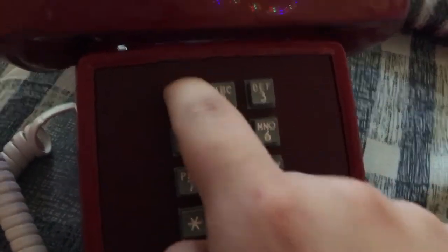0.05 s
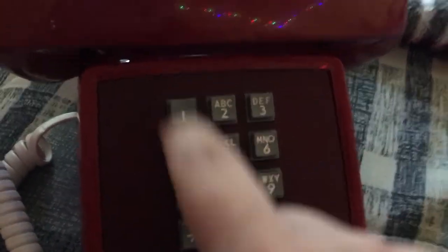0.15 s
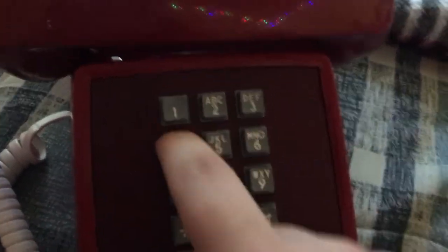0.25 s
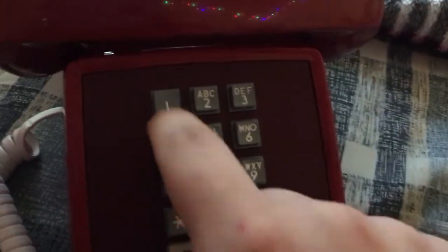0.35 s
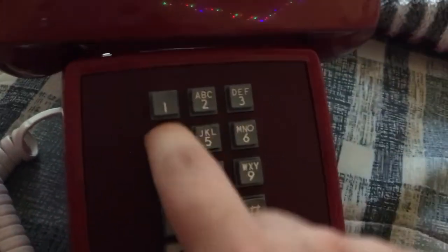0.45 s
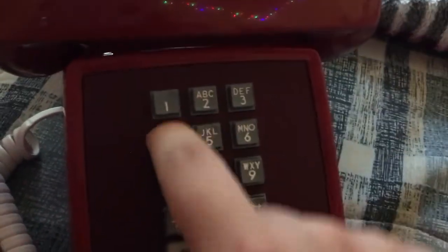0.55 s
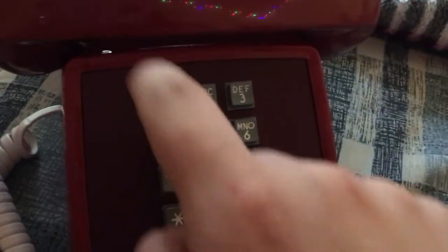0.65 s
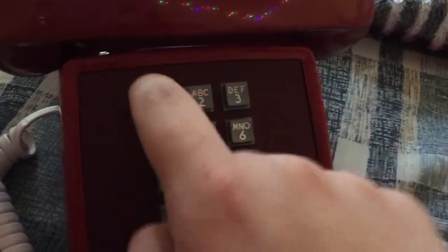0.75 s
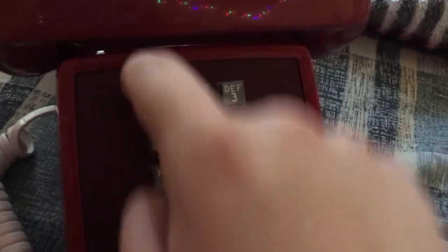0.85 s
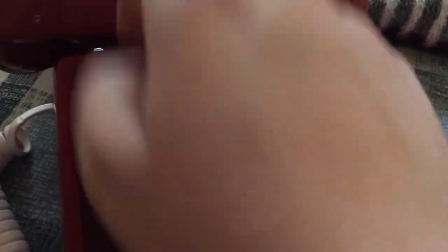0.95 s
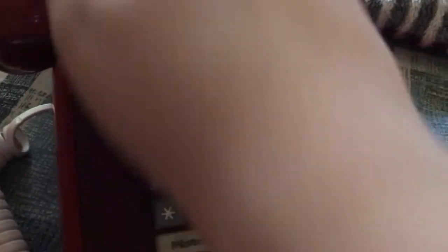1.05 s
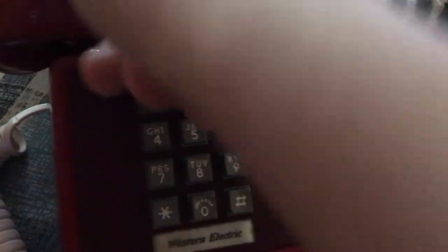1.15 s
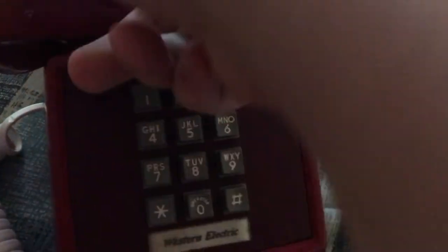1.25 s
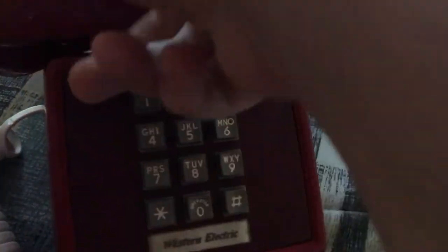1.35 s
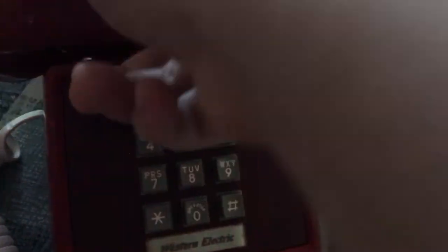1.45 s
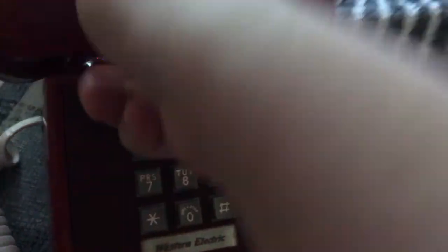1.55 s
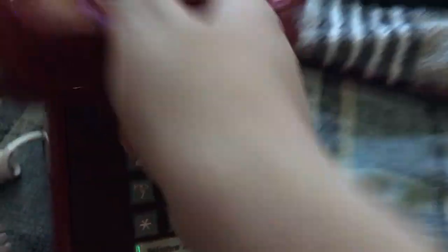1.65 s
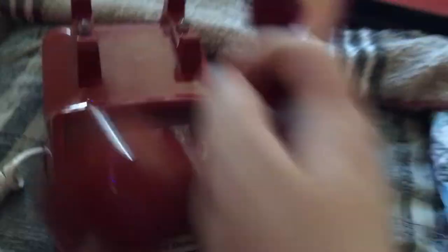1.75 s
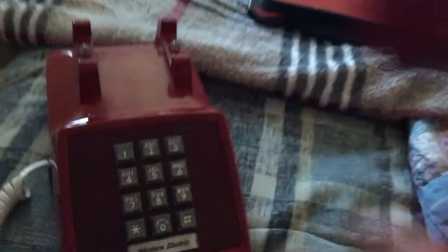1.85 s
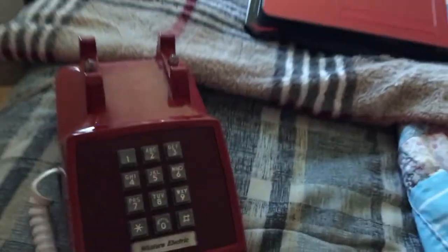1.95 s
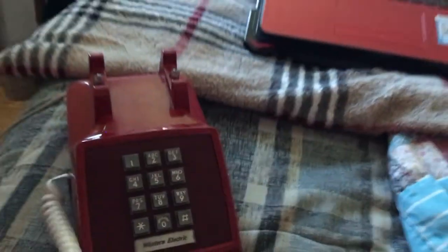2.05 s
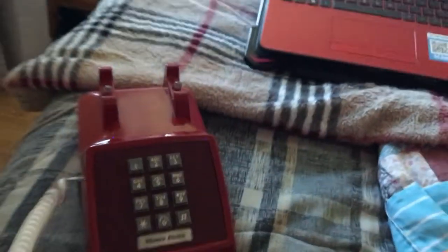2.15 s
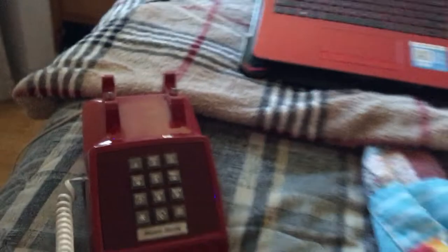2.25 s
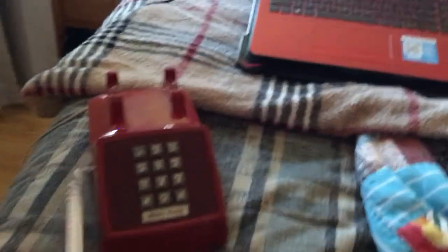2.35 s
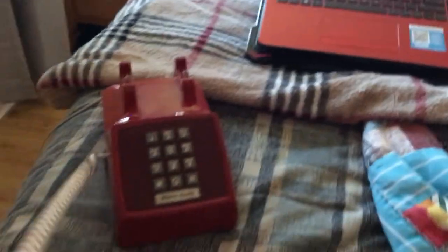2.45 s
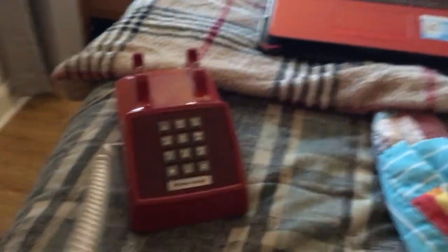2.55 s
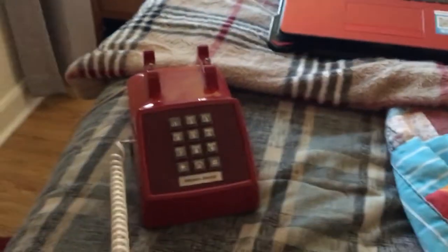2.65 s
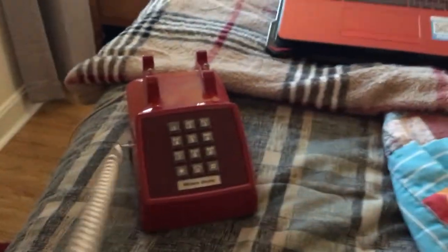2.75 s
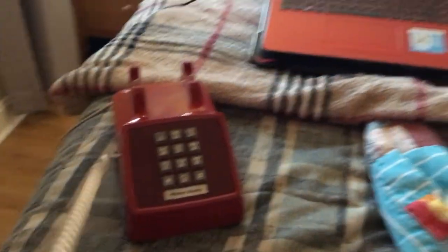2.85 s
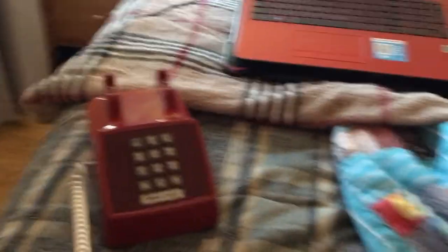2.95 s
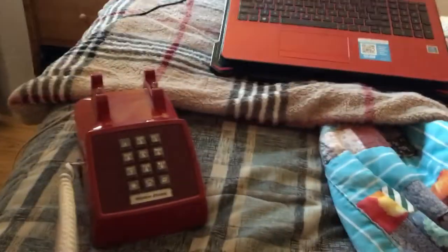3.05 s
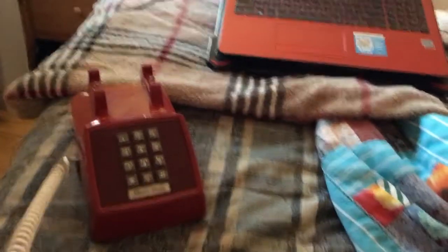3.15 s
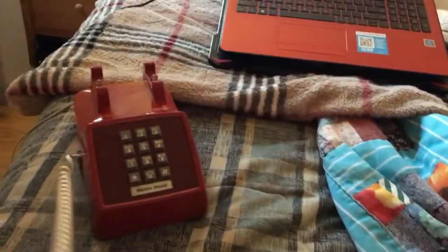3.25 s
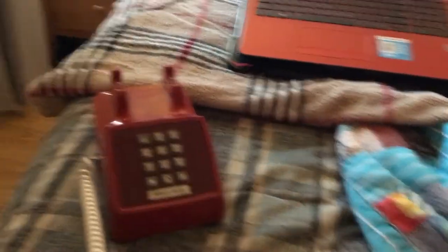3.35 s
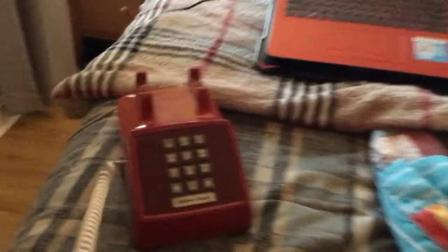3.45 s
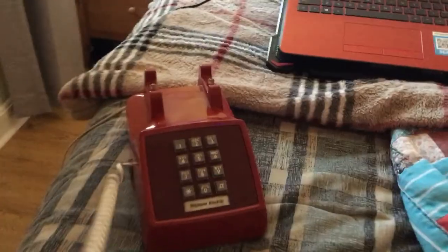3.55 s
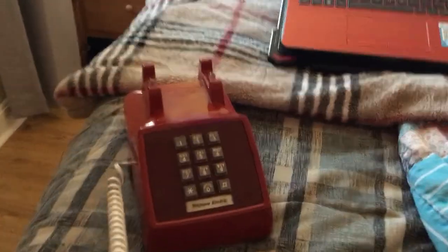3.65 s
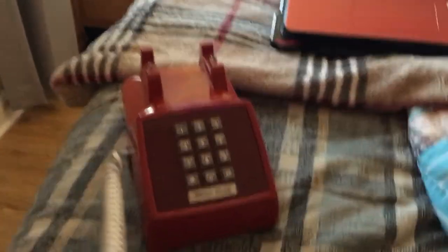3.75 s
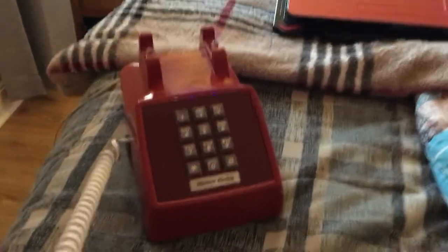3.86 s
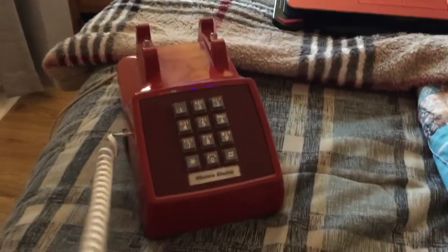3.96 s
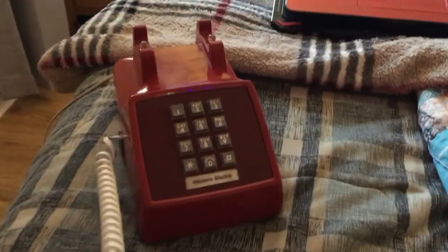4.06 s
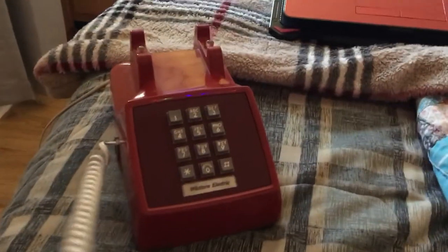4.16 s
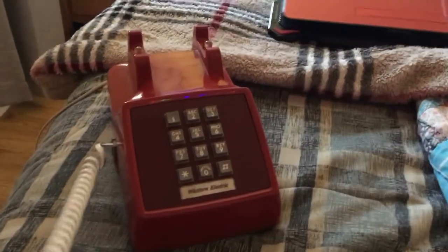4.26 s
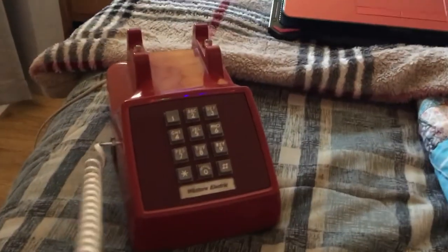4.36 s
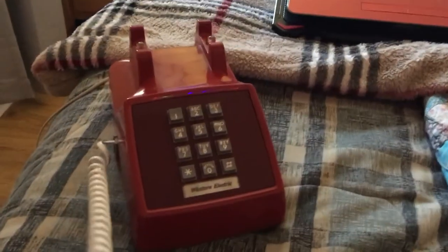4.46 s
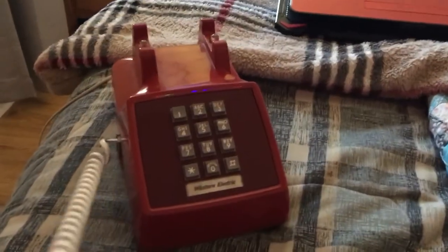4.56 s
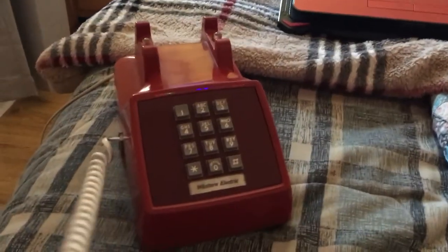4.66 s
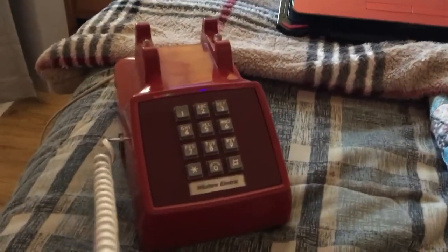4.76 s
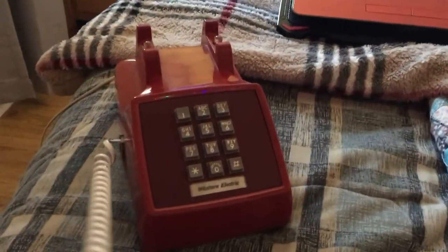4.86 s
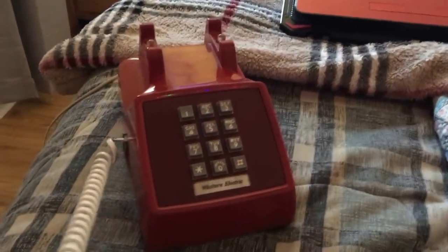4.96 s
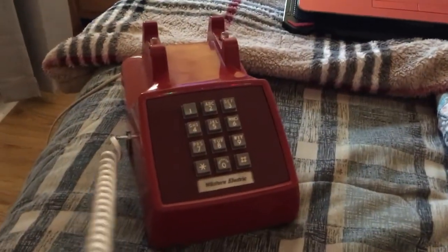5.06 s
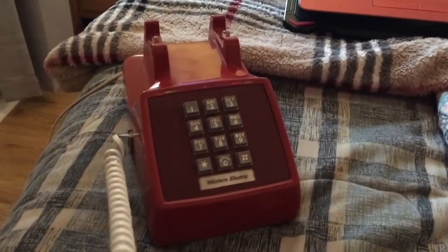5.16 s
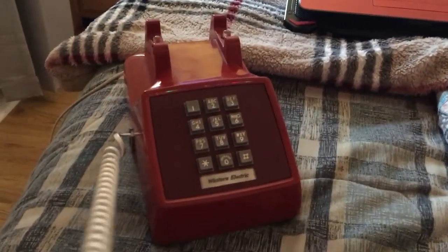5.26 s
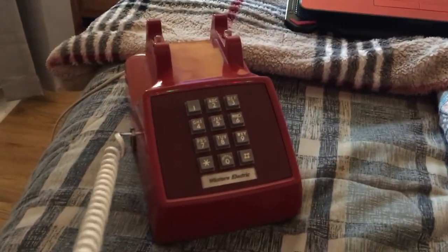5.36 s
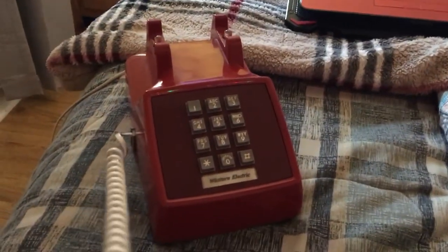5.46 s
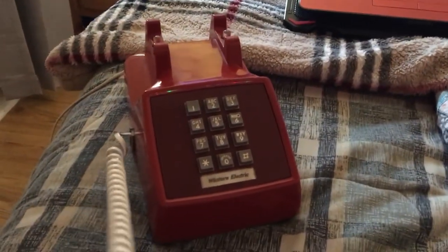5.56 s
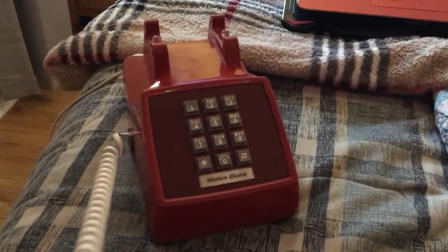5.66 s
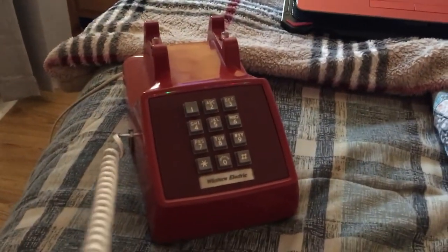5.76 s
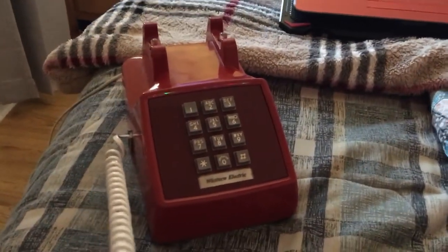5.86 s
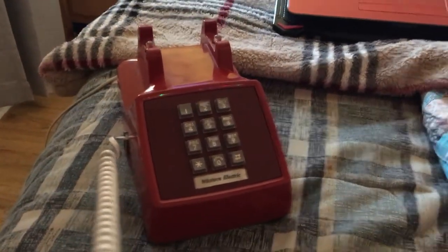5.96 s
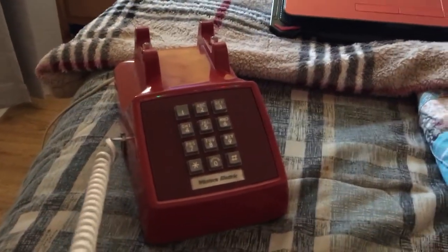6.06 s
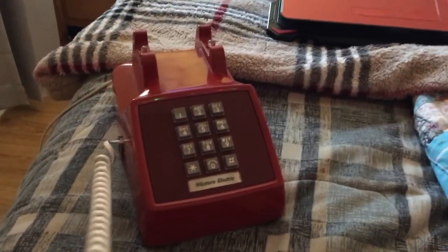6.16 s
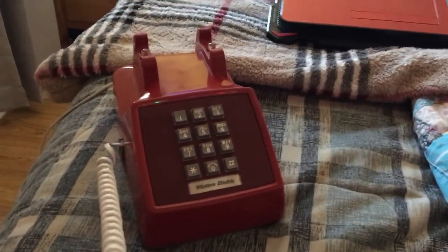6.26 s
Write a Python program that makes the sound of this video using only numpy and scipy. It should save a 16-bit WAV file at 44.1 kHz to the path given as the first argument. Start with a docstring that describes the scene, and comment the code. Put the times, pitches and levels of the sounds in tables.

```python
"""A push-button desk telephone on a bed, close by: four keys click down, three of them snap back up on their springs.
A hand works the handset off its cradle, and the hook switch springs up with a ringing clack.
Contacts are bursts of band-limited noise plus decaying sine modes; rubs are swelling noise.
A small bedroom adds a short tail to the contacts. Sines hum; a fan whirs faintly and drops back after four seconds."""
import sys
import numpy as np
from scipy import signal
from scipy.fft import rfft, irfft, next_fast_len
from scipy.io import wavfile
from scipy.ndimage import map_coordinates

SR = 44100
rng = np.random.default_rng(int(sys.argv[2]) if len(sys.argv) > 2 else 0)


def output_pcm(signal):
    """Save a mono or channel-first signal as 16-bit PCM at the path in sys.argv[1].

    Samples are clipped to [-1, 1] before scaling.
    """
    pcm = np.clip(np.atleast_2d(signal).T, -1, 1) * 32767
    wavfile.write(sys.argv[1], SR, np.round(pcm).astype(np.int16))


N = 278712
TIME = np.arange(N) / SR
AGE = np.arange(SR // 2) / SR  # time since a contact [s]

# ringing modes of the keypad: (frequency [Hz], relative level [dB], t60 [s])
KEYPAD_MODES = [(432, -8, 0.13), (493, -6, 0.097), (606.7, 2.5, 0.13), (770, -17.5, 0.017),
                (893, 1.5, 0.084), (1183, 4, 0.097), (1550, -10.5, .035), (1660, 15, 0.037),
                (2924, -1, 0.032)]
# spectrum of handset plastic on its cradle: (frequency [Hz], relative level per Hz [dB])
HANDSET_COLOUR = [(70, -21), (150, 0.5), (250, -2.5), (480, 2), (750, -1), (1000, -5), (1250, -1),
                  (1700, -8), (2200, -7.5), (2700, -15.5), (3300, -13), (5000, -22.5), (8000, -15.5),
                  (10500, -32.5), (16000, -45)]


def amp(db):
    """Gain from dB."""
    return 10 ** (np.asarray(db) / 20)


def unit(x):
    """Scale to rms 1."""
    return x / np.sqrt(np.mean(x ** 2) + 1e-20)


def unit_attack(x):
    """Scale to rms 1 over the first 10 ms."""
    return x / np.sqrt(np.mean(x[:SR // 100] ** 2) + 1e-20)


def along(points, hz):
    """Interpolate (frequency, value) points on a log frequency axis."""
    point_hz, value = np.transpose(points)
    return np.interp(np.log(hz + 1), np.log(point_hz + 1), value)


def wobble(rate_hz):
    """Smooth random curve with rate_hz knots a second."""
    knots = rng.standard_normal(int(N * rate_hz / SR) + 4)
    return map_coordinates(knots, [TIME * rate_hz])


def wavering_sine(hz, depth, rate_hz):
    """Sine whose frequency wanders by the relative depth."""
    return np.sin(2 * np.pi * np.cumsum(hz * (1 + depth * wobble(rate_hz))) / SR)


def noise(colour, size, band_hz=(0, SR)):
    """Noise of rms 1 with the given spectrum inside a band."""
    fft_size = next_fast_len(size)
    hz = np.fft.rfftfreq(fft_size, 1 / SR)
    gain = amp(along(colour, hz)) * (hz >= band_hz[0]) * (hz < band_hz[1])
    white = rng.standard_normal(fft_size)
    return unit(irfft(rfft(white) * gain, fft_size)[:size])


def add(track, start_s, sound):
    """Mix a sound into the track."""
    part = track[round(start_s * SR):][:len(sound)]
    part += sound[:len(part)]


def swell(rise_s, t60_s):
    """Contact envelope: builds over the rise time, then decays exponentially."""
    decay = amp(-60 * np.maximum(AGE - rise_s, 0) / t60_s)
    return (1 - np.exp(-(AGE / rise_s) ** 2)) * decay


def stroke(peak_s, db, fade_s):
    """Gain of a rub that speeds up to its peak and slows again; fade_s is the e-folding time."""
    return amp(db) * np.exp(-np.abs(TIME - peak_s) / fade_s)


def step(middle_s, length_s):
    """Smooth change from 0 to 1."""
    return (1 + np.tanh((TIME - middle_s) / length_s)) / 2


def band_levels(shares_db, db, bright_db=0):
    """Level of each band of a contact; bright_db per band tilts them towards the treble."""
    return db + np.array(shares_db) + bright_db * (np.arange(len(shares_db)) - 1)


def contact(rise_s, levels_db, colour, t60s_s):
    """Dense, fast-dying modes of hard plastic as banded noise; low bands build more slowly."""
    # noise bands, low to high: (bottom [Hz], top [Hz])
    bands_hz = [(60, 350), (350, 1400), (1400, 6500), (6500, 17000)]
    out = np.zeros(len(AGE))
    # fewer levels than bands: the lowest bands stay silent
    for db, band_hz, t60_s in zip(levels_db, bands_hz[-len(levels_db):], t60s_s):
        burst = noise(colour, len(AGE), band_hz) * swell(rise_s + 1 / band_hz[1], t60_s)
        out += amp(db) * unit_attack(burst)
    return out


def ring(modes):
    """Long-lived modes of a body as decaying sines, at new strengths and phases for every blow."""
    hz, db, t60_s = np.transpose(modes)[:, :, None]
    strength = amp(db + rng.standard_normal(hz.shape))  # 1 dB scatter
    phase = 2 * np.pi * (hz * AGE + rng.random(hz.shape))
    waves = strength * amp(-60 * AGE / t60_s) * np.sin(phase)
    attack = 1 - np.exp(-AGE / 0.0039)
    return waves.sum(0) / np.linalg.norm(strength) * 2 * attack


def in_room(x, wet_db):
    """A sound plus the bedroom's answer: a dull cluster of wall reflections inside a short tail."""
    # decay of the room: (frequency [Hz], t60 [s])
    room_t60 = [(150, 0.15), (800, 0.29), (3000, 0.28), (8000, 0.29), (16000, 0.29)]
    # spectrum of the answer, before wet_db: (frequency [Hz], level [dB])
    room_wet = [(150, -16), (500, -3), (1200, -6), (3000, -10), (8000, -16), (16000, -18)]
    delay_s, walls_s, walls_width_s = 0.008, 0.0092, 0.0042  # walls_s counts from the delayed start
    walls_gain, walls_cutoff_hz = 0.87, 2000
    hz, t, z = signal.stft(rng.standard_normal(len(AGE)), SR, nperseg=128)
    cluster = walls_gain * np.exp(-((t - walls_s) / walls_width_s) ** 2)
    cluster = cluster / (1 + (hz[:, None] / walls_cutoff_hz) ** 2)
    decay = amp(-60 * t / along(room_t60, hz)[:, None])
    decay = decay * (1 + 1.3 * np.exp(-t / 0.014) + cluster)
    tail = signal.istft(z * decay, SR, nperseg=128)[1][:len(AGE)]
    tail = tail * (1 - np.exp(-AGE / 0.00099))
    size = 2 * len(AGE)
    f = np.fft.rfftfreq(size, 1 / SR)
    answer = rfft(tail / np.linalg.norm(tail), size) * amp(wet_db + along(room_wet, f))
    answer = answer * np.exp(-2j * np.pi * f * delay_s)
    return irfft(rfft(x, size) * (1 + answer), size)


def motor_hum():
    """A motor hums: harmonics of one wandering rotation, each wavering in level, easing late on."""
    # hum partials: (multiple of the fundamental, mean rms level before the drop [dB])
    hum_partials = [(1, -54), (2, -71), (3, -68.5), (4, -87)]
    hum_hz, drop_s, drop_db, change_s = 86.1, 4.75, 4, 0.2
    turns = np.cumsum(hum_hz * (1 + 0.0026 * wobble(2.98))) / SR
    hum = np.zeros(N)
    for multiple, db in hum_partials:
        sine = np.sin(2 * np.pi * round(multiple) * turns)
        hum += amp(db + 1.1 * wobble(4)) * sine * np.sqrt(2)
    return amp(-drop_db * step(drop_s, change_s)) * hum


def fan():
    """Shaped noise for air, plus a whine and a fluttering whistle that stop as the air drops back."""
    # air noise: (frequency [Hz], relative level per Hz [dB])
    fan_air = [(150, -13.5), (380, 3), (720, -3), (1000, 1), (1500, -6.5), (2600, -12.5), (8000, -25.5),
               (16000, -27.5)]
    # narrow whir that swells before the drop: (frequency [Hz], relative level per Hz [dB])
    whir_colour = [(500, -27), (800, -6), (1000, 2), (1200, -13), (2000, -30), (16000, -60)]
    air_db, drop_s, drop_db, change_s = -69.5, 4.19, 6.5, 0.06
    tones_start_s, tones_db = 2.85, -75
    whine = wavering_sine(857, 0.006, 20)
    whistle = amp(-7.5 + 3.0 * wobble(14)) * wavering_sine(2660, 0.0177, 200)
    dropped = step(drop_s, change_s)
    air = amp(air_db - drop_db * dropped) * noise(fan_air, N)
    tones = amp(tones_db) * step(tones_start_s, change_s) * (1 - dropped) * (whine + whistle)
    whir = stroke(3.93, -71.5, fade_s=0.15) * noise(whir_colour, N)
    return air + tones + whir


def room_noise():
    """Steady rumble and thin hiss, both shaped noise."""
    # rumble: (frequency [Hz], relative level per Hz [dB])
    rumble_colour = [(18, -17), (28, -9), (36, -8.5), (45, 1), (60, 1.5), (78, -1.5), (100, -15),
                     (180, -12.5), (330, -22.5), (600, -27.5), (1500, -45.5), (16000, -65)]
    # hiss: (frequency [Hz], relative level per Hz [dB])
    hiss_colour = [(500, -22), (1500, -0.5), (2500, 2.5), (4000, 1), (4900, -4), (6400, 2.5), (7700, -3.5),
                   (9000, 0), (10500, -6), (11800, -1), (16000, -10.5)]
    return amp(-54.5) * noise(rumble_colour, N) + amp(-74.5) * noise(hiss_colour, N)


def key_click(rise_s, levels_db):
    """Plastic strikes plastic and the keypad rings."""
    # key contact: (frequency [Hz], relative level per Hz [dB])
    key_colour = [(250, -37), (440, -0.5), (850, -9), (1200, 1.5), (2400, -9), (3070, -6), (4300, -9.5),
                  (6100, -5), (7000, -2), (9400, 2.5), (10300, -8), (14100, -6.5), (16000, -18)]
    click = contact(rise_s, levels_db, key_colour, t60s_s=(0.036, 0.021, 0.017))
    return in_room(click + amp(levels_db[0] + 0.5) * ring(KEYPAD_MODES), wet_db=-3.5)


def key_presses():
    """Each key scuffs down its guide, touches its spring and hits bottom."""
    # keys hitting bottom, the third twice: (time [s], level [dB], brightness [dB per band])
    presses = [(0.0347, -35, 3), (0.2959, -34.5, 0.1), (0.568, -33, -1), (0.5815, -45, -7.5),
               (0.8867, -37.5, 1)]
    # share of each band, low to high: (level [dB], ...)
    press_bands = (-6, 0, -8.5)
    # scuff: (frequency [Hz], relative level per Hz [dB])
    push_colour = [(400, -4), (1200, 2.5), (3000, -5), (5000, -3.5), (9000, -6), (11000, -11),
                   (16000, -13.5)]
    scuff_lead_s, scuff_db, scuff_fade_s = 0.013, -18, 0.0069  # dB relative to the press
    touch_lead_s, touch_db, touch_bright_db = 0.0045, -15.5, 10.5
    out, scuff = np.zeros(N), np.zeros(N)
    for s, db, bright_db in presses:
        scuff += stroke(s - scuff_lead_s, db + scuff_db, scuff_fade_s)
        touch_levels = band_levels(press_bands, db + touch_db, touch_bright_db)
        add(out, s - touch_lead_s, key_click(0.00035, touch_levels))
        add(out, s, key_click(0.00026, band_levels(press_bands, db, bright_db)))
    return out + scuff * noise(push_colour, N)


def key_releases():
    """A key let go rattles up; the linkage knocks back after it, with a thud on the case."""
    # keys springing back: (time [s], rise [s], level [dB], linkage delay [s], linkage level [dB],
    # case thud level [dB])
    releases = [(0.1458, 0.0019, -27.5, 0.0321, -39, -58), (0.4114, 0.003, -35.5, 0.036, -39, -55.5),
                (0.714, 0.0019, -28.5, 0.0306, -36.5, -44)]
    # share of each band of the click, low to high: (level [dB], ...)
    release_bands = (-9, 0, -1.2)
    # share of the linkage's knock, clack and snap: (level [dB], ...)
    linkage_bands = (-2, 0, -14.5)
    # linkage contact: (frequency [Hz], relative level per Hz [dB])
    return_colour = [(120, -4), (250, 0.5), (420, -0.5), (900, -2.5), (1500, -2), (2200, -0.5), (3000, -5),
                     (4000, -3.5), (4800, -17.5), (6000, -11), (9000, -15), (11000, -23.5), (16000, -30)]
    out = np.zeros(N)
    for s, rise_s, db, delay_s, linkage_db, thud_db in releases:
        add(out, s, key_click(rise_s, band_levels(release_bands, db)))
        levels_db = (thud_db, *band_levels(linkage_bands, linkage_db))
        knock = contact(0.00022, levels_db, return_colour, t60s_s=(0.09, 0.062, 0.028, 0.014))
        ringing = amp(linkage_db - 4.5) * ring(KEYPAD_MODES)
        add(out, s + delay_s, in_room(knock + ringing, wet_db=-1.5))
    return out


def handset():
    """The hollow handset knocks on the cradle: banded noise plus ringing body modes."""
    # knocks: (time [s], rise [s], level [dB], brightness [dB per band])
    knocks = [(1.1127, 0.00078, -52, 3.5), (1.151, 0.00046, -29.5, 1.5), (1.171, 0.00084, -36.5, -4),
              (1.4505, 0.0005, -41, -4), (1.5046, 0.0012, -32.5, -0.8), (1.6454, 0.00074, -29.5, -0.7)]
    # share of each band, low to high: (level [dB], ...)
    handset_bands = (-12, -4.5, -9, -22)
    # body modes: (frequency [Hz], relative level [dB], t60 [s])
    handset_modes = [(194.6, -6, 0.22), (257, -5, 0.089), (468, 2, 0.13), (522, -7, 0.14), (605, -3, 0.1),
                     (730, 4, 0.062), (927, 4, 0.084), (1177, 8.5, 0.053), (1243, 7, 0.047),
                     (1360, -15, 0.052), (2000, -27, 0.063)]
    out = np.zeros(N)
    for s, rise_s, db, bright_db in knocks:
        levels_db = band_levels(handset_bands, db, bright_db)
        knock = contact(rise_s, levels_db, HANDSET_COLOUR, t60s_s=(0.067, 0.03, 0.026, 0.026))
        add(out, s, in_room(knock + amp(db - 10.5) * ring(handset_modes), wet_db=1.0))
    return out


def rubbing():
    """Plastic slides under the hand and the handset drags, sticking and slipping: flickering noise."""
    # slides: (time of peak [s], level [dB], fade [s])
    slides = [(1.287, -68.5, 0.014), (1.55, -64, 0.13), (1.757, -58.5, 0.02), (1.815, -67.5, 0.043)]
    # sliding plastic: (frequency [Hz], relative level per Hz [dB])
    slide_colour = [(500, -10.5), (2000, 2.5), (3200, -1), (5000, -2), (9000, -6.5), (10500, -7.5),
                    (13000, -6), (16000, -16)]
    # drags over the cradle: (time of peak [s], level [dB], fade [s])
    drags = [(1.457, -54, 0.015), (1.55, -49, 0.021)]
    slide_noise = unit(noise(slide_colour, N) * amp(2.5 * wobble(400)))
    drag_noise = unit(noise(HANDSET_COLOUR, N) * amp(5.0 * wobble(160)))
    out = sum(stroke(*row) for row in slides) * slide_noise
    return out + sum(stroke(*row) for row in drags) * drag_noise


def ticks():
    """Light ticks of handled plastic: short banded noise."""
    # ticks: (time [s], level [dB], brightness [dB per band])
    tick_events = [(1.385, -58, 14), (1.403, -47.5, 4.5), (1.407, -48, -1), (1.43, -48.5, 8.5),
                   (1.525, -58, 1), (1.554, -57.5, 3), (1.575, -58, -10), (1.583, -47, -5)]
    # share of each band, low to high: (level [dB], ...)
    tick_bands = (-7.5, 0, -8.5)
    # tick contact: (frequency [Hz], relative level per Hz [dB])
    tick_colour = [(300, -15), (700, -18.5), (2000, 0), (3100, -0.5), (5000, -6), (8000, -4), (9700, -3),
                   (10600, -18.5), (16000, -18)]
    out = np.zeros(N)
    for s, db, bright_db in tick_events:
        levels_db = band_levels(tick_bands, db, bright_db)
        tick = contact(0.0008, levels_db, tick_colour, t60s_s=(0.035, 0.022, 0.016))
        add(out, s, in_room(tick, wet_db=-2.5))
    return out


def squeaks():
    """The handset squeaks as it slips free: brief sines of unsteady pitch."""
    # squeaks: (time of peak [s], frequency [Hz], level [dB])
    squeak_events = [(1.762, 2990, -53), (1.821, 2920, -65)]
    out = np.zeros(N)
    for s, hz, db in squeak_events:
        pulse = np.exp(-((TIME - s) / 0.0077) ** 2)
        out += amp(db) * pulse * wavering_sine(hz, 0.0203, 500)
    return out


def hook_switch():
    """Freed of the handset, the switch hits its stop, bounces once and sets the base ringing."""
    # share of each band, low to high: (level [dB], ...)
    hook_bands = (-4, 0, -5.5)
    # switch contact: (frequency [Hz], relative level per Hz [dB])
    hook_colour = [(330, -32), (480, 2.5), (780, -3), (1100, 5.5), (1400, -8.5), (1900, 1), (2700, 3),
                   (3200, -9), (3900, -4.5), (4900, -9.5), (6200, -1), (7400, -15.5), (8400, -11.5),
                   (10400, -22), (12200, -15.5), (16000, -33)]
    # modes of the telephone's base: (frequency [Hz], relative level [dB], t60 [s])
    base_modes = [(498, 1, .15), (597, -9, 0.11), (680, 7, 0.1), (757, -6, 0.16), (790, -11, 0.064),
                  (1000, -9, .13), (1120, 1, .12), (1237, -2, .14), (1890, 5, .13), (1923, -5, 0.15),
                  (2280, -6, 0.14), (2620, -14, .1)]
    hit_s, hit_db, bounce_s, loss_db = 1.884, -31, 0.0258, 24
    out = np.zeros(N)
    for s, db in [(hit_s, hit_db), (hit_s + bounce_s, hit_db - loss_db)]:
        levels_db = band_levels(hook_bands, db)
        clack = contact(0.00036, levels_db, hook_colour, t60s_s=(0.03, 0.017, 0.014))
        add(out, s, in_room(clack, wet_db=2.0))
        add(out, s, amp(db - 5) * ring(base_modes))
    return out


def rustle():
    """Cloth rustles as the arm draws back: swelling noise."""
    # cloth: (frequency [Hz], relative level per Hz [dB])
    rustle_colour = [(200, -5.5), (500, 2), (1300, 0.5), (3000, -8.5), (8000, -18), (16000, -23.5)]
    return stroke(2.1, -66, fade_s=0.244) * noise(rustle_colour, N)


def bumps():
    """Soft, dull handling bumps: decaying low noise."""
    # bumps: (time [s], level [dB])
    bump_events = [(2.268, -55.5), (2.398, -60), (5.065, -52), (5.173, -61), (5.283, -65.5), (5.396, -62.5)]
    # bump contact: (frequency [Hz], relative level per Hz [dB])
    bump_colour = [(200, -19), (390, 10.5), (520, -2), (650, -5), (850, -3), (1200, -29), (3000, -41)]
    out = np.zeros(N)
    for s, db in bump_events:
        bump = unit_attack(noise(bump_colour, len(AGE)) * swell(0.0007, 0.061))
        add(out, s, in_room(amp(db) * bump, wet_db=-5))
    return out


def far_tick():
    """One small, bright tick away from the telephone, heard mostly through the room."""
    # tick: (frequency [Hz], relative level per Hz [dB])
    far_colour = [(1000, -28), (2200, -16), (2600, 0), (3200, -13), (4000, -0.5), (5000, -11), (7000, -8),
                  (7700, 4), (9000, -1), (10400, -6), (11500, -6), (16000, -23)]
    out = np.zeros(N)
    tick = unit_attack(noise(far_colour, len(AGE)) * swell(0.0005, 0.035))
    add(out, 3.4133, in_room(amp(-60) * tick, wet_db=15.5))
    return out


def scene():
    """The telephone in the humming room, in mono."""
    background = motor_hum() + fan() + room_noise()
    keys = key_presses() + key_releases()
    handling = rubbing() + ticks() + squeaks() + rustle() + bumps()
    return (background + keys + handset() + handling + hook_switch() + far_tick())[None]


def record(dry):
    """The recorder keeps nothing above its band limit."""
    top_hz = 16100
    size = next_fast_len(N + SR // 2)
    keep = np.fft.rfftfreq(size, 1 / SR) < top_hz
    return irfft(rfft(dry, size) * keep, size)[:, :N]


dry = scene()
out = record(dry)
output_pcm(out)
```